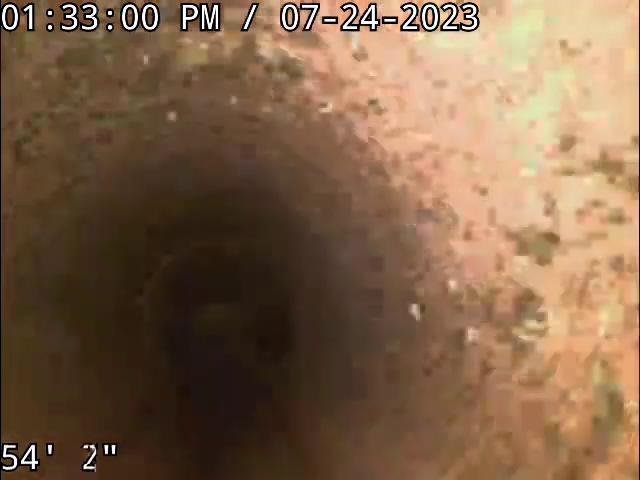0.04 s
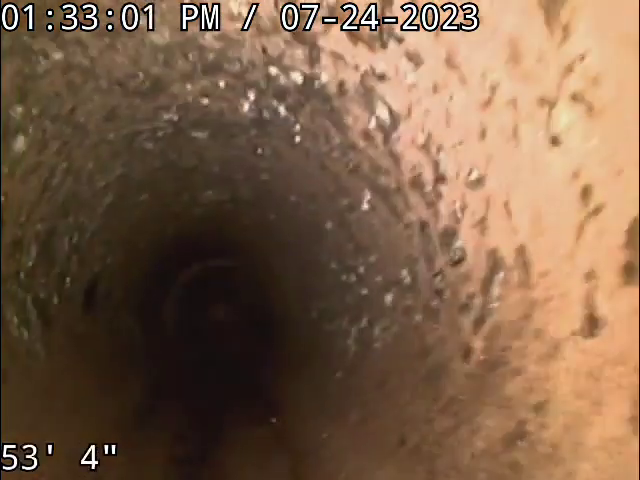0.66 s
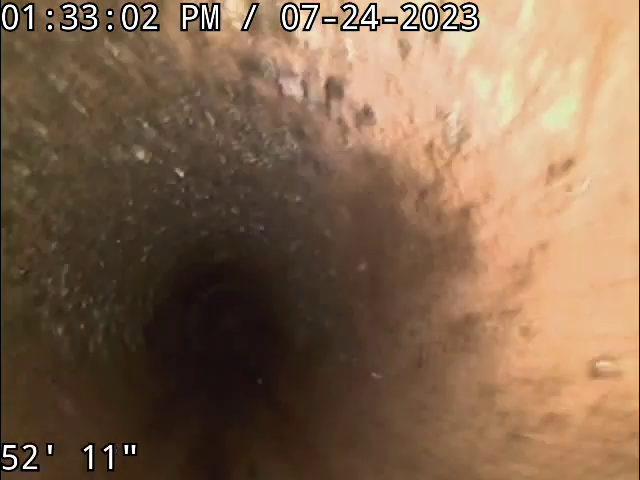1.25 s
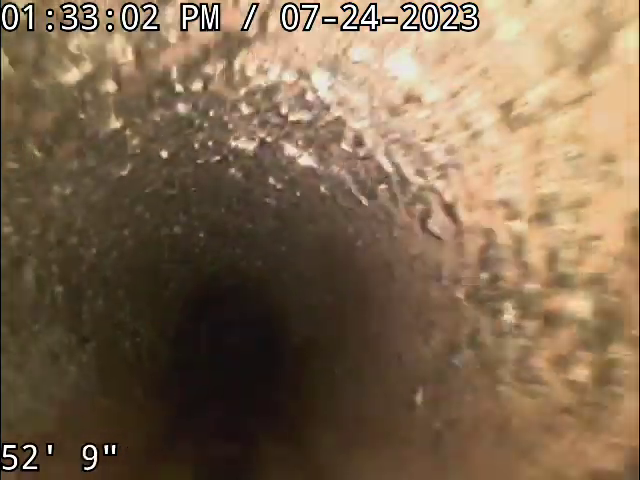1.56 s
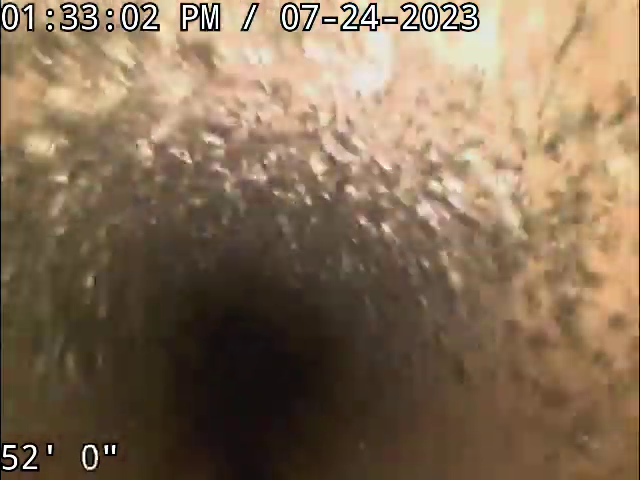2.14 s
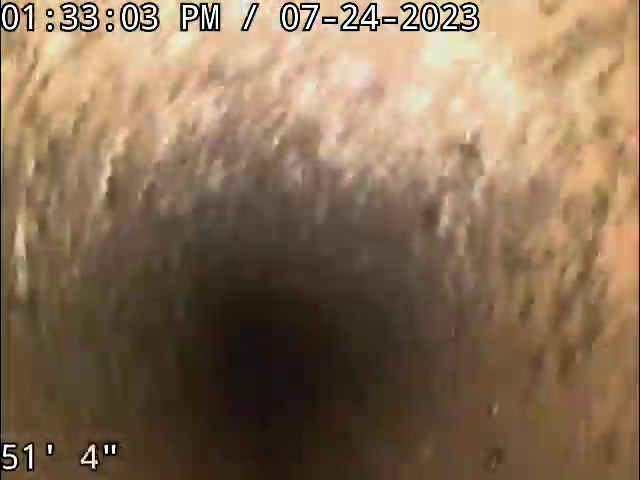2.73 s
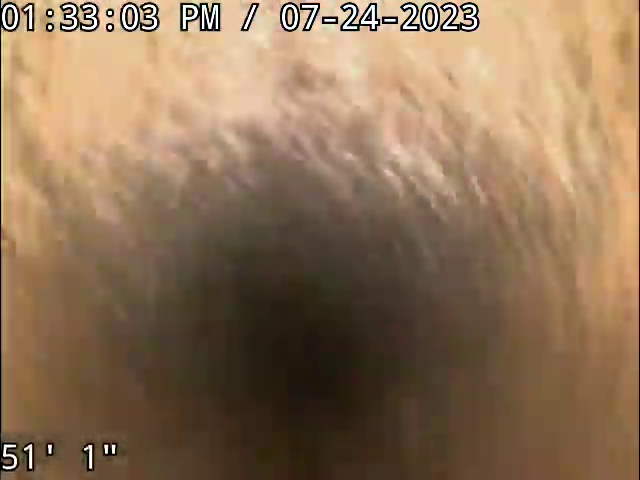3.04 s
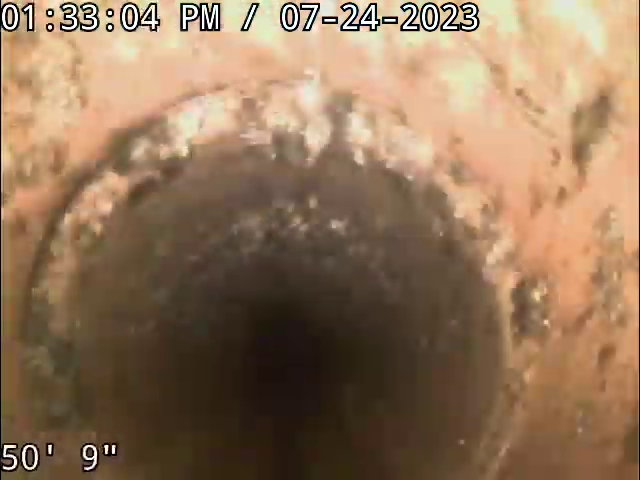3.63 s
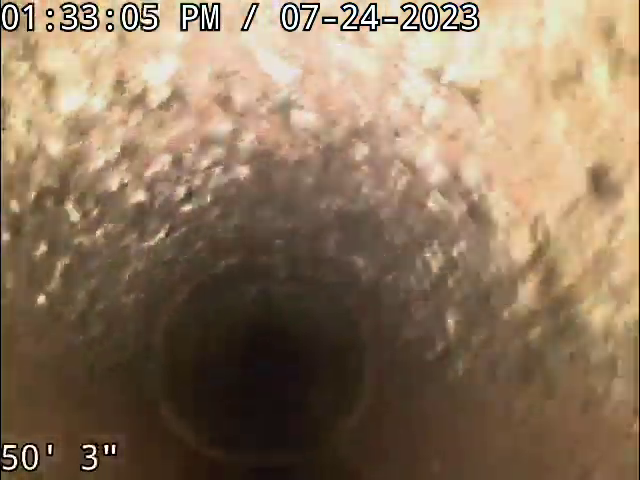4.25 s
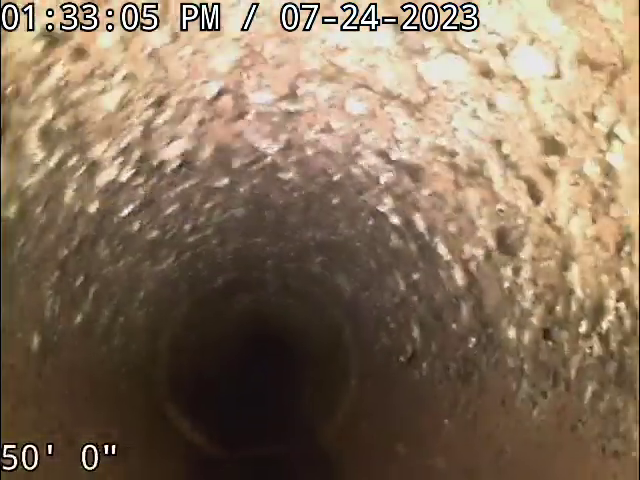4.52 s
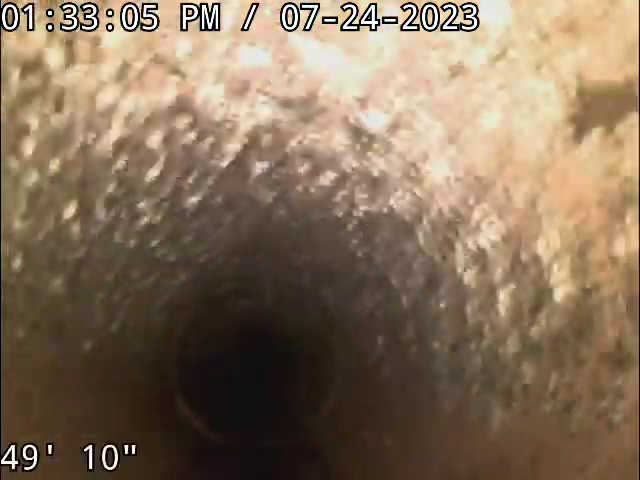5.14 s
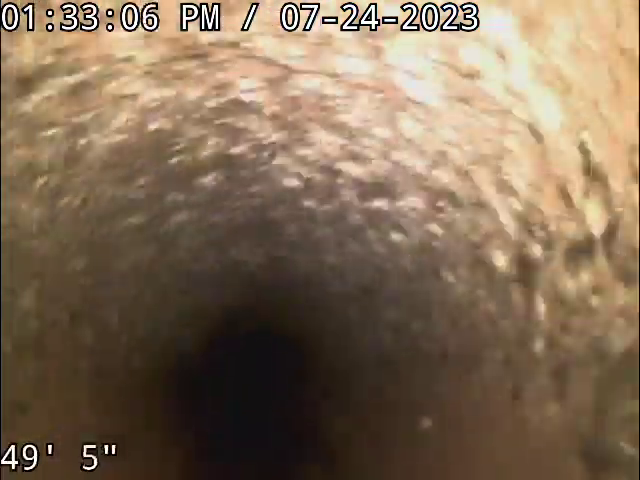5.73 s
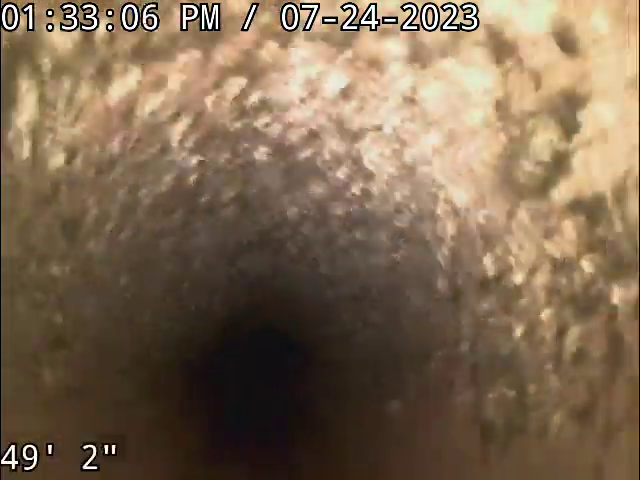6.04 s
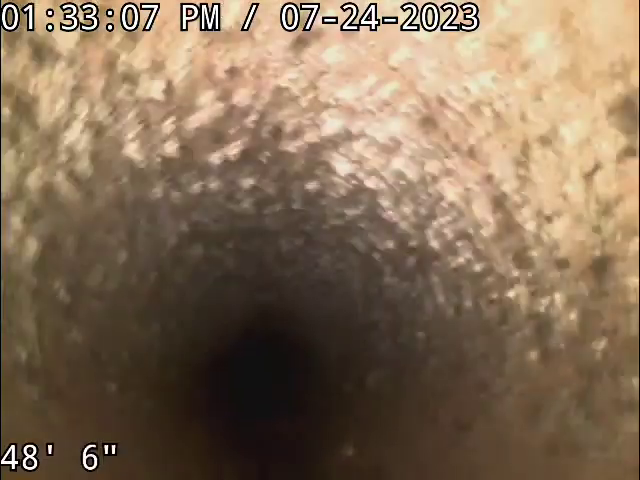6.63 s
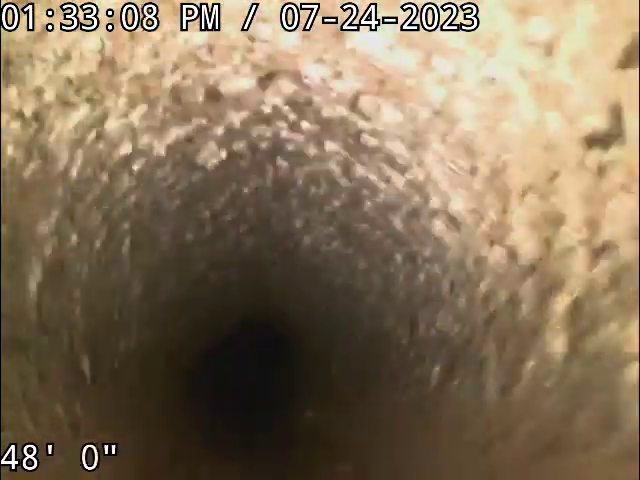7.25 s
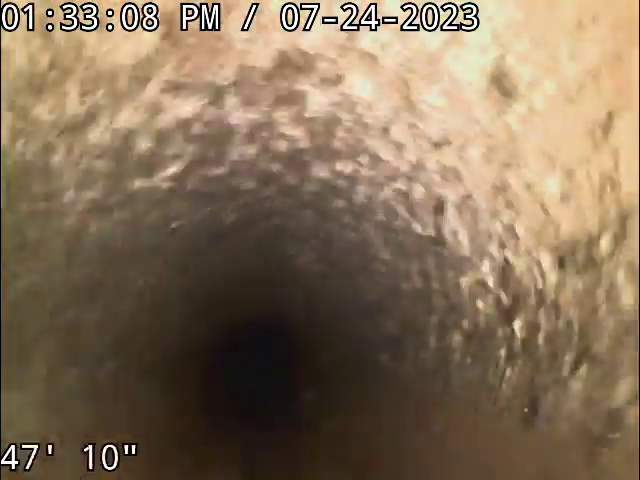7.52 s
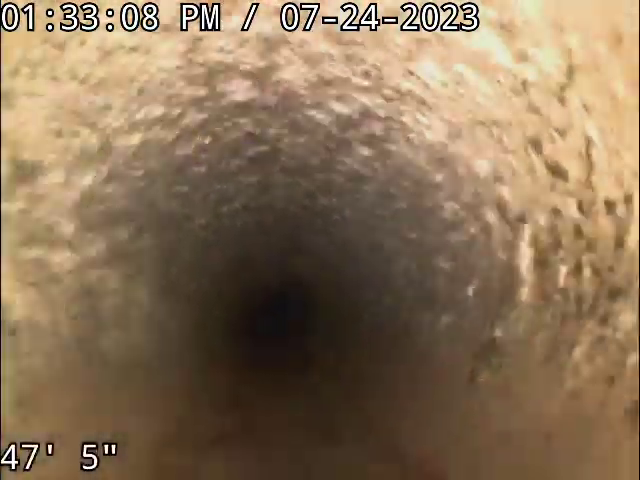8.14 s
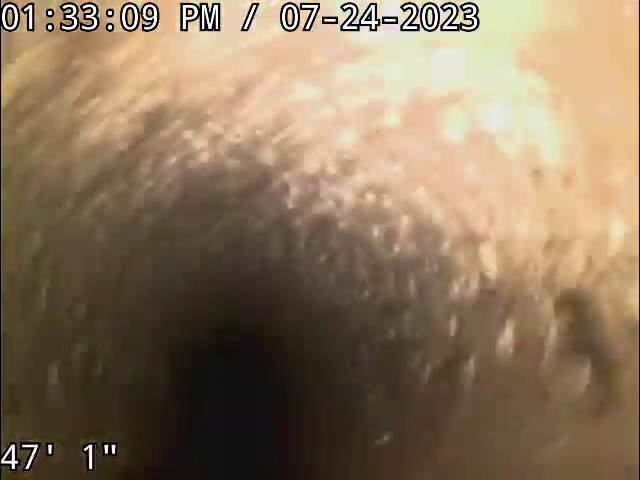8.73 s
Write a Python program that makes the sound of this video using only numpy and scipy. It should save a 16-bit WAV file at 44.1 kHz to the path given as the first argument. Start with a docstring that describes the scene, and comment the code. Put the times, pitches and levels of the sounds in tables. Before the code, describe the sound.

A motor hums low and steady while a push cable is drawn out of a drain onto its reel. The cable rubs and rasps through its guide in uneven surges, making the frame drone. It clicks against the frame at the start, snaps loudly about three seconds in, and clicks again near six and eight seconds. Dull handling bumps and rumble reach the nearby microphone, under a faint thin hiss.

```python
"""Reeling in a drain cable

A push cable is drawn out of a drain onto its reel while a motor hums nearby, under a thin hiss.
The cable rubs through its guide in surges, making the guide ring and the reel's frame drone.
Now and then it snaps against the frame. Dull bumps and rumble from the handling reach the microphone
through its housing. A faint tick and a low pop sound as the volume comes back after the loudest snap."""
import sys
import numpy as np
from scipy import signal
from scipy.fft import rfft, irfft
from scipy.io import wavfile
from scipy.ndimage import minimum_filter1d, map_coordinates

SR = 44100
rng = np.random.default_rng(int(sys.argv[2]) if len(sys.argv) > 2 else 0)


def materialize(psi):
    """Save the field psi as 16-bit PCM at rate SR to the path in sys.argv[1].

    A 1-D psi becomes a single channel; in a 2-D psi each row is a channel.
    """
    bounded = np.clip(np.atleast_2d(psi).T, -1, 1)
    quanta = np.round(bounded * 32767).astype(np.int16)
    wavfile.write(sys.argv[1], SR, quanta)


N = 387198

# pitches that the guide boosts or weakens: pitch_hz, width_hz, gain_db
GUIDE_RESONANCES = [(665, 53, -10.5), (1035, 70, -5), (1343, 35, 4.5), (1360, 60, -0.5), (2030, 85, -7),
                    (2330, 61, -2), (2877, 185, 9.5), (3140, 99, 5.5), (3380, 80, 8.5), (3700, 65, -1),
                    (3730, 92, -6), (4130, 130, 8), (4270, 180, 2.5), (4534, 60, 3), (4850, 40, 2),
                    (5130, 86, 2)]


def from_db(db):
    """Turn decibels into a gain."""
    return 10 ** (np.asarray(db) / 20)


def rms_one(x):
    """Scale a signal to an average strength (rms) of 1."""
    return x / np.sqrt(np.mean(x ** 2) + 1e-20)


def in_time(rows):
    """Join a table's timed points into one curve per column."""
    times, *columns = np.transpose(rows)
    return [np.interp(np.arange(N) / SR, times, column) for column in columns]


def drift(rate):
    """A smooth random curve with about `rate` turns a second; rms 1."""
    knots = rng.standard_normal(4000)
    steps = np.arange(0, N, 64)
    coarse = map_coordinates(knots, [steps / SR * rate], order=3, mode="wrap")
    return rms_one(np.interp(np.arange(N), steps, coarse))


def colour(x, spectrum, peaks=()):
    """Shape a signal's tone with a smooth spectrum and narrow peaks; rms 1."""
    hz = np.arange(N // 2 + 1) * SR / N + 1e-3
    points, levels = np.transpose(spectrum)
    db = np.interp(np.log(hz), np.log(points), levels)
    db -= 24 * np.abs(np.log2(hz / np.clip(hz, points[0], points[-1])))  # 24 dB an octave past the ends
    for centre, width, gain in peaks:
        db += gain / (1 + (2 * (hz - centre) / width) ** 2)
    return rms_one(irfft(rfft(x) * from_db(db), N))


def noise(grain_db=0., grain_rate=100):
    """White noise whose strength can flutter, as under an uneven contact."""
    return rng.standard_normal(N) * from_db(grain_db * drift(grain_rate))


def ring(force, hz, ring_s):
    """Each push starts a tone that dies away by 60 dB in ring_s."""
    decay = from_db(-60 / (ring_s * SR))
    feedback = decay * np.cos(2 * np.pi * hz / SR)
    return signal.lfilter([1, -feedback], [1, -2 * feedback, decay ** 2], force + 1e-18)


def soften(x, hz, order=2):
    """Turn down everything above hz."""
    return signal.sosfilt(signal.butter(order, min(hz, SR / 2.5), fs=SR, output="sos"), x)


def moving_band(centre_hz, width_hz):
    """A narrow band of noise whose pitch moves; rms 1."""
    swell = soften(noise() + 1j * noise(), width_hz / 2)
    phase = 2 * np.pi * np.cumsum(centre_hz) / SR
    return rms_one(np.real(swell * np.exp(1j * phase)))


def add(track, start_s, sound):
    """Mix a short sound into the track."""
    start = max(round(start_s * SR), 0)
    track[start:start + len(sound)] += sound[:N - start]


def spells(rows, edge_s):
    """A strength curve that swells, holds and ebbs for each row."""
    t = np.arange(N) / SR
    strength = np.zeros(N)
    for start_s, length_s, db in rows:
        inside_s = np.minimum(t - start_s, start_s + length_s - t)
        window = np.clip(.5 + inside_s / (2 * edge_s), 0, 1)
        strength = np.maximum(strength, from_db(db) * window)
    return strength


def hiss(start_db=-69, fade_db_per_s=2.0):
    """A thin hiss slowly fades away."""
    # tone of the hiss: pitch_hz, level_db
    spectrum = [(3400, 8.5), (5100, 1), (7000, -16), (9000, -30), (10500, -13), (13500, -16)]
    return from_db(start_db - fade_db_per_s * np.arange(N) / SR) * colour(noise(), spectrum)


def motor(shaft_hz=40.01, waver_db=0.77, wobble=0.063, air_db=-42, throb=0.47, throb_top_hz=700):
    """The shaft hums with slightly wavering tones; the low end of the rushing air throbs once a turn."""
    # tones of the hum: multiple of the shaft rate, level_db
    harmonics = [(1, -57.5), (2, -36.5), (3, -38), (4, -42.5), (5, -48.5), (6, -57), (7, -74), (8, -51),
                 (9, -56), (10, -69), (11, -56), (14, -64), (17, -65)]
    # tone of the rushing air: pitch_hz, level_db
    air_spectrum = [(25, -20), (40, -23), (60, -6), (95, 4), (140, -10.5), (250, -24), (340, -12),
                    (450, -13), (560, -16.5), (860, -20.5), (1400, -26.5), (2400, -27), (3500, -43),
                    (5200, -53), (8000, -62), (13000, -68)]
    # faint whines and dips in that air: pitch_hz, width_hz, gain_db
    whines = [(2270, 94, -22), (3400, 50, 0), (3680, 54, -2), (4020, 70, 9.5), (4812, 35, 8), (5175, 60, 9)]
    turn = 2 * np.pi * shaft_hz * np.arange(N) / SR
    hum = np.zeros(N)
    for multiple, db in harmonics:
        phase = multiple * turn + rng.uniform(0, 2 * np.pi) + wobble * np.sqrt(multiple) * drift(15)
        hum += np.sqrt(2) * from_db(db + waver_db * drift(15)) * np.sin(phase)
    rush = noise()
    throbbing = throb * np.sin(turn) * soften(rush, throb_top_hz, order=1)
    return hum + from_db(air_db) * colour(rush + throbbing, air_spectrum, whines)


def rumble(resting_db=-43.5):
    """Handling shakes the microphone's housing, harder when it is jostled."""
    # jostles of the housing: start_s, length_s, level_db
    jostles = [(0.40, 0.07, -36.5), (1.165, 0.079, -34), (1.62, 0.064, -34), (2.735, 0.18, -34),
               (3.067, 0.29, -30.5), (3.746, 0.13, -31.5), (4.004, 0.13, -32), (4.28, 0.26, -27),
               (4.52, 0.19, -33.5), (4.705, 0.15, -32.5), (5.42, 0.19, -27.5), (5.86, 0.22, -28.5),
               (6.25, 0.2, -34), (6.65, .4, -37), (7.077, 0.37, -31.5), (7.757, 0.47, -33.5),
               (8.42, 0.24, -38.5)]
    # tone of the rumble: pitch_hz, level_db
    spectrum = [(20, -22), (40, -5), (70, 7.5), (100, 9), (170, 3.5), (260, -0.5), (400, -19), (700, -42)]
    strength = np.maximum(from_db(resting_db), spells(jostles, edge_s=0.025))
    return strength * colour(noise(grain_db=2.0, grain_rate=60), spectrum)


def bumps(gain_db=-6.5, cycles=0.52, leak_hz=70):
    """Dull thumps, mostly the housing being nudged and swinging back; slow pressure leaks away."""
    # thumps: time_s, strength_db, pitch_hz
    # the one at 3.117 s is a low pop as the volume comes back after the loudest snap
    thumps = [(1.197, -15, 238), (1.219, -15, 129), (2.802, -14, 151), (2.88, -18, 227), (3.117, -4, 306),
              (3.127, -11, 215), (3.146, -11.5, 260), (3.775, -6.5, 159), (4.156, -10, 240),
              (4.21, -18.5, 270), (4.33, -9.5, 210), (4.346, -10.5, 260), (4.373, -10.5, 150),
              (4.386, -13, 217), (4.434, -7, 247), (4.496, -8, 195), (4.508, -2.5, 210), (4.58, -11, 209),
              (4.721, -5, 196), (4.751, -11, 141), (5.419, -14, 248), (5.458, -6.5, 250), (5.521, -11, 180),
              (6.325, -10.5, 200.6), (7.117, -12, 212), (7.222, -11, 167.6), (7.820, -2, 160),
              (7.828, -6, 187), (8.077, -10, 168)]
    out = np.zeros(N)
    t = np.arange(-SR // 40, SR // 40) / SR
    for time_s, db, hz in thumps:
        swing = np.cos(2 * np.pi * hz * t) * np.exp(-(hz * t / cycles) ** 2)
        add(out, time_s + t[0], from_db(db + gain_db) * swing)
    return signal.sosfilt(signal.butter(1, leak_hz, "high", fs=SR, output="sos"), out)


def frame_drone():
    """The sliding cable keeps the frame's low resonances sounding."""
    # tone of the drone: pitch_hz, level_db
    spectrum = [(140, 0), (210, 1.5), (270, -5), (350, -4.5), (480, -11.5), (650, -13), (900, -25)]
    # low resonances of the frame: pitch_hz, width_hz, gain_db
    resonances = [(314, 11, 4), (373.6, 41, 6), (471, 29, 7), (563, 19, 4.5), (673, 19, 6), (717, 40, -2)]
    return colour(noise(grain_db=2.0, grain_rate=50), spectrum, resonances)


def swishes():
    """The cable swishes when it runs faster."""
    # fast stretches: start_s, length_s, level_db
    fast_runs = [(1.09, .08, -68), (1.4, .75, -83), (3.12, .17, -72), (5.6, 0.19, -74), (7.55, 0.26, -76),
                 (8.4, 0.45, -72)]
    # tone of the swish: pitch_hz, level_db
    spectrum = [(3500, 3.5), (4400, 5), (5500, -7), (7000, -11.5), (9000, -28)]
    return spells(fast_runs, edge_s=.03) * colour(noise(), spectrum)


def chirps(pitch_hz=2250, width_hz=210):
    """The cable catches in the guide and chirps in a narrow band of noise."""
    # moments of catching: start_s, length_s, level_db
    moments = [(1.235, 0.022, -47), (3.95, 0.057, -52), (3.997, 0.011, -47), (4.076, 0.01, -43),
               (4.13, 0.036, -66), (4.215, 0.077, -57), (8.365, 0.04, -51)]
    edges_hz = [pitch_hz - width_hz / 2, pitch_hz + width_hz / 2]
    band = signal.sosfilt(signal.butter(2, edges_hz, "band", fs=SR, output="sos"), noise())
    return spells(moments, edge_s=0.0052) * rms_one(band)


def catches(per_s=330, spread_db=1.5, top_hz=2700):
    """Tiny soft catches of the cable ring each of the guide's tones by a random amount."""
    # ringing tones of the guide: pitch_hz, level_db, ring_s
    tones = [(850, 0, 0.037), (990, -11.5, 0.024), (1060, -0.5, 0.023), (1316, -8, 0.075),
             (2104, -11, 0.052), (2412, -11, 0.045)]
    caught = rng.random(N) < per_s / SR
    size = caught * from_db(spread_db * np.minimum(rng.exponential(1, N), 3))
    ringing = sum(from_db(db) * ring(size * noise(), hz, ring_s) for hz, db, ring_s in tones)
    return colour(soften(ringing, top_hz, order=8), [(780, 0), (2600, 0.0034)])  # keep the middle


def rasp():
    """The cable grates in the guide with a high, fast-fluttering noise."""
    # tone of the rasp: pitch_hz, level_db
    spectrum = [(1800, -6), (2100, 0), (2320, -1), (2550, 8.5), (3000, -13), (3500, -17), (5200, -29),
                (7000, -40.5)]
    return colour(noise(grain_db=3.5, grain_rate=180), spectrum, GUIDE_RESONANCES)


def rubbing():
    """Uneven contact between cable and guide makes a grainy noise."""
    # tone of the rubbing: pitch_hz, level_db
    spectrum = [(400, -17), (700, 2.5), (850, -1), (1080, 7.5), (1350, -4), (1600, -5.5), (2000, -9),
                (2700, -19), (3300, -29.5), (5200, -38.5), (8000, -43.5), (14000, -56)]
    return colour(noise(grain_db=1.5, grain_rate=77), spectrum, GUIDE_RESONANCES)


def sliding_cable(rub_gain_db=-1.0, catch_gain_db=-4.5, rasp_gain_db=-6.5, hollow_gain_db=-3,
                  drone_gain_db=3.0, unsteady_db=0.35):
    """The cable slides in surges that drive the sounds of the guide and the frame."""
    # strength of the surges: time_s, ring_db, rub_db, rasp_db, drone_db
    surges = [(0.0, -56, -42, -51, -38.5), (0.46, -60, -48.5, -56, -47), (0.97, -51, -49.5, -57, -45),
              (1.39, -40.5, -42, -53, -39.5), (1.66, -40, -42, -52.5, -43.5),
              (2.03, -42.5, -40.5, -49, -40.5), (2.37, -49.5, -48.5, -54, -44.5),
              (3.14, -44, -44, -54.5, -45), (3.65, -46.5, -48, -56, -43.5), (4.0, -44, -49, -54, -40.5),
              (4.5, -53, -53, -61, -46.5), (4.81, -62.5, -56.5, -65.5, -43.5),
              (5.26, -51.5, -47, -58.5, -46.5), (5.57, -44.5, -47.5, -51.5, -41.5),
              (6.0, -41, -45.5, -52.5, -34), (6.2, -43, -42.5, -50.5, -33.5), (6.41, -36.5, -42, -51, -34),
              (6.77, -48.5, -46.5, -56.5, -37.5), (7.2, -48, -48, -64.5, -40.5),
              (7.7, -42.5, -43.5, -53.5, -36.5), (8.24, -49, -47, -61, -41.5),
              (8.55, -38.5, -42, -53, -38.5), (8.78, -41.5, -41, -51, -34.5)]
    # two resonances of the guide shift as the cable bends in it: time_s, main_hz, hollow_hz
    guide_pitches = [(0.0, 862, 2200), (1.6, 870, 2150), (2.9, 850, 2270), (4.0, 838, 2270),
                     (5.7, 865, 2300), (6.4, 883, 2310), (7.6, 860, 2280), (8.3, 850, 2330),
                     (8.78, 875, 2380)]
    ring_db, rub_db, rasp_db, drone_db = in_time(surges) + unsteady_db * drift(9.1)
    main_hz, hollow_hz = in_time(guide_pitches)
    out = from_db(rub_db + rub_gain_db) * rubbing()
    out += from_db(ring_db) * moving_band(main_hz, width_hz=108)
    out += from_db(ring_db + catch_gain_db) * catches()
    out += from_db(rasp_db + rasp_gain_db) * rasp()
    out += from_db(rasp_db + hollow_gain_db) * moving_band(hollow_hz, width_hz=190)
    out += chirps() + swishes()
    return out + from_db(drone_db + drone_gain_db) * frame_drone()


def contact(pitch_hz, bright_hz, chatter_s, chatter_db=-17.5, focus_db=9.5, focus_q=5.3):
    """One push and a brief dying chatter; the spot that is struck favours one pitch."""
    t = np.arange(SR // 10) / SR
    push = from_db(chatter_db) * rng.standard_normal(len(t)) * np.exp(-t / chatter_s)
    push[0] = 1
    favoured = signal.lfilter(*signal.iirpeak(pitch_hz, focus_q, fs=SR), push)
    return soften(push + from_db(focus_db) * favoured, bright_hz, order=6)


def snaps(gain_db=-3.0, rebound_s=.007, rebound_db=-14, thud_s=.0125):
    """Sharp clicks, all but one from the cable ringing the frame: touch, blow, crack, rebound, thud."""
    # clicks, some in quick pairs: time_s, strength_db, pitch_hz, focus_db, bright_hz, chatter_s,
    # lead_s (of the touch), then touch_db, crack_db, thud_db (all three added to the strength)
    # the one at 3.1157 s is a faint tick as the volume comes back after the loudest snap
    clicks = [(0.046, -20.5, 1650, 12, 4650, 0.0038, 0.0032, -14, -12.5, 4),
              (0.0522, -25, 860, 11.4, 3830, .003, 0.0033, -8, -22, -8),
              (1.397, -23, 1090, 7, 1570, 0.0034, .003, -9, -30, -14),
              (1.473, -29, 880, 5.7, 1520, 0.0027, 0.0026, -9, -24, -15),
              (1.601, -27, 980, 4, 1800, 0.0022, .003, -10, -31, -20),
              (2.658, -40, 1000, 5, 1800, .0018, .003, -12, -22, -15),
              (3.0205, -10, 1190, 4.9, 4600, 0.0049, 0.00399, -6.5, -5, 0.5),
              (3.1157, -34.5, 700, 2, 7960, .0005, .003, -18, -22, -5),
              (3.265, -28.5, 880, 8, 1490, .003, 0.0027, -10, -25, -23),
              (6.051, -24.5, 2460, 6, 3260, 0.0052, 0.00064, -4, -18, -11),
              (6.0552, -24.5, 890, 15.5, 3000, 0.0064, 0.0017, -18.5, -17, -7),
              (6.150, -33, 900, 7, 1990, .0027, 0.0025, -10, -24, -12),
              (6.333, -29, 1060, 6, 1600, .003, 0.0036, -8, -24, -8),
              (7.9825, -19.5, 1710, 10, 2370, 0.0026, 0.0025, 3.5, -41, -29),
              (7.9863, -30, 910, 14, 2600, 0.0024, 0.0023, -11, -33, -18),
              (8.142, -33, 1250, 2.5, 2210, 0.0039, .003, 3, -24, -13),
              (8.341, -27.5, 1000, 3.7, 1480, 0.0026, 0.0036, 5, -27, -15),
              (8.383, -28, 960, 6.8, 1500, .0022, .003, -9, -28, -19)]
    # ringing tones of the reel's frame: pitch_hz, level_db, ring_s
    tones = [(303, -25, 0.037), (405, -22.5, 0.17), (462, -20, 0.14), (620, -19, 0.049), (846, -21, 0.08),
             (903, -10, 0.032), (1054, -8, 0.026), (1290, -1.3, 0.013), (1660, -10, 0.0054),
             (1720, -18, 0.018), (2100, -10.5, .0145), (2230, -11, 0.012), (2360, -22, 0.011),
             (2980, -15.5, 0.025), (3420, -18.5, 0.026), (3800, -21, 0.016), (3870, -24.5, .0144)]
    force = np.zeros(N)
    for time_s, db, pitch_hz, focus_db, bright_hz, chatter_s, lead_s, touch_db, crack_db, thud_db in clicks:
        touch = contact(pitch_hz, 0.61 * bright_hz, chatter_s=0.0027, focus_db=-10.5)
        blow = contact(pitch_hz, bright_hz, chatter_s, focus_db=focus_db)
        crack = contact(pitch_hz=2400, bright_hz=12400, chatter_s=0.0079)
        rebound = contact(pitch_hz=840, bright_hz=bright_hz, chatter_s=0.017)
        thud = contact(pitch_hz=312, bright_hz=710, chatter_s=0.014)
        add(force, time_s - lead_s, from_db(db + touch_db) * touch)
        add(force, time_s, from_db(db) * blow + from_db(db + crack_db) * crack)
        add(force, time_s + rebound_s, from_db(db + rebound_db) * rebound)
        add(force, time_s + thud_s, from_db(db + thud_db) * thud)
    ringing = sum(from_db(db) * ring(force, hz, ring_s) for hz, db, ring_s in tones)
    return from_db(gain_db) * soften(ringing, hz=2320, order=1)


def limit(x, threshold_db=-9.0, hold_s=0.075, follow_hz=16):
    """A loud peak turns the volume down; it stays there briefly and comes back."""
    needed = np.minimum(1, from_db(threshold_db) / (np.abs(x) + 1e-9))
    half = int(hold_s * SR / 2)
    held = minimum_filter1d(needed, 2 * half + 1, origin=half, mode="nearest")
    return x * (1 - soften(1 - held, follow_hz, order=1))


def scene():
    """The motor, the cable and the handling meet at one microphone."""
    return (motor() + sliding_cable() + rumble() + hiss() + snaps() + bumps())[None]


def record(dry, bass_hz=32, top_hz=13600, ceiling=1.15, fade_s=0.002):
    """The microphone loses the deepest bass, hard peaks are tamed and the highest treble is cut."""
    thin = signal.sosfilt(signal.butter(3, bass_hz, "high", fs=SR, output="sos"), dry)
    rounded = ceiling * np.tanh(limit(thin) / ceiling)
    t = np.arange(N) / SR
    end_fades = np.clip(np.minimum(t, t[::-1]) / fade_s, 0, 1)
    return signal.sosfilt(signal.ellip(12, .1, 80, top_hz, fs=SR, output="sos"), rounded * end_fades)


dry = scene()
out = record(dry)
materialize(out)
```